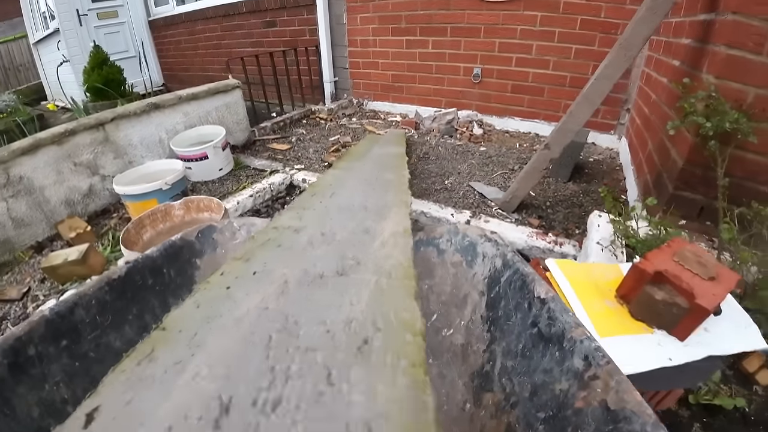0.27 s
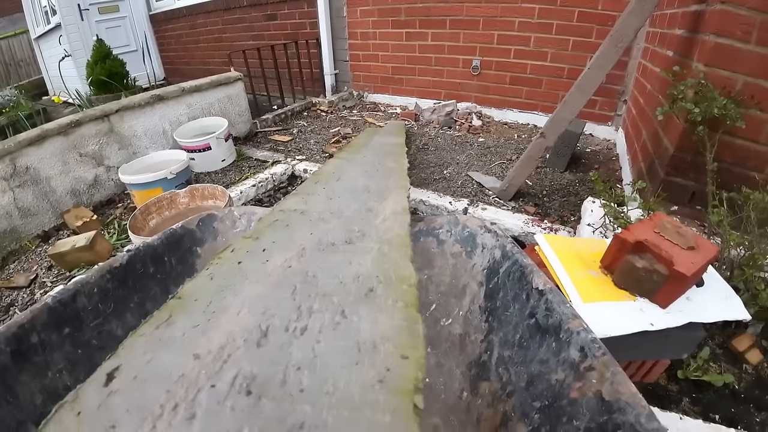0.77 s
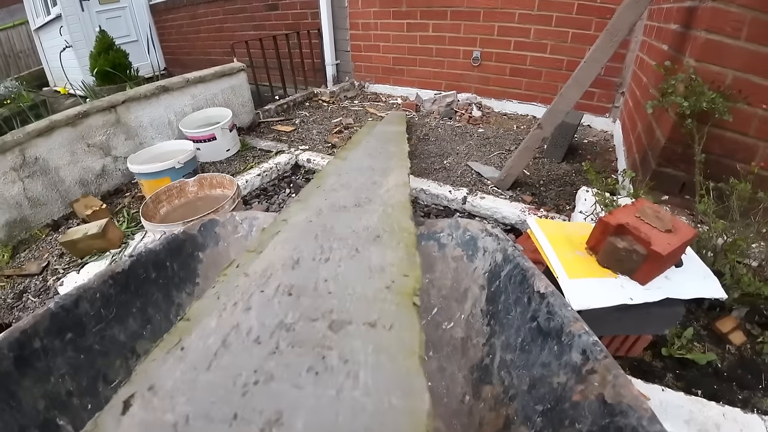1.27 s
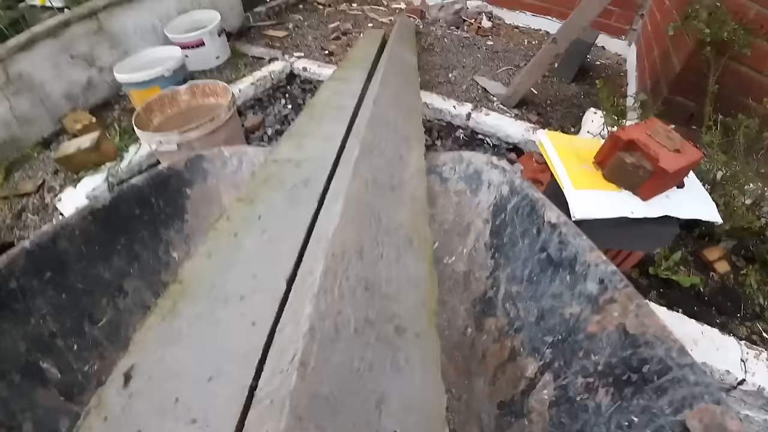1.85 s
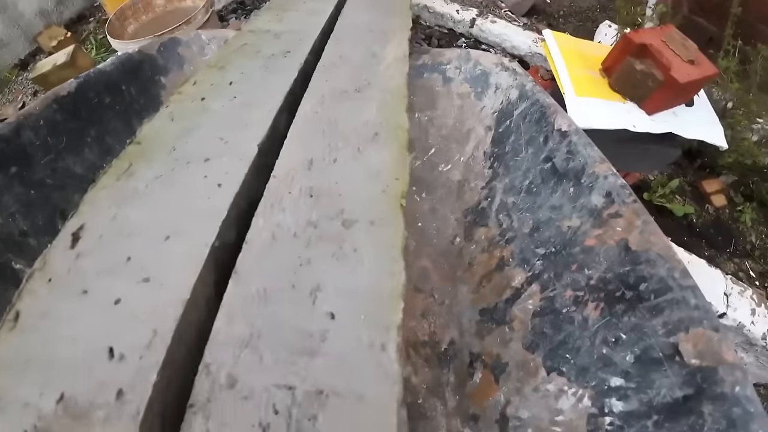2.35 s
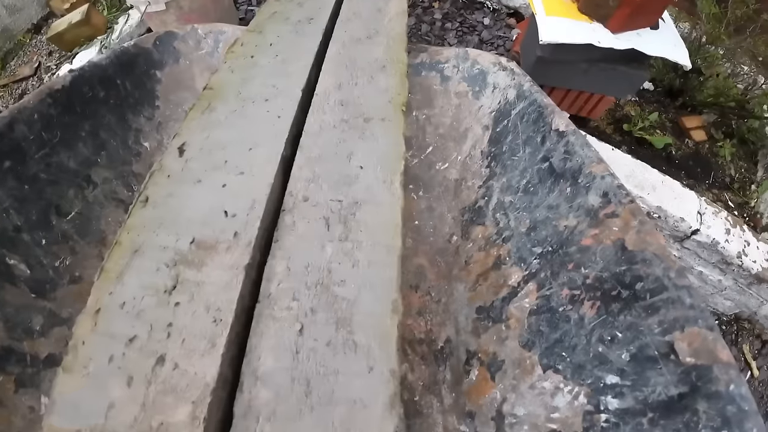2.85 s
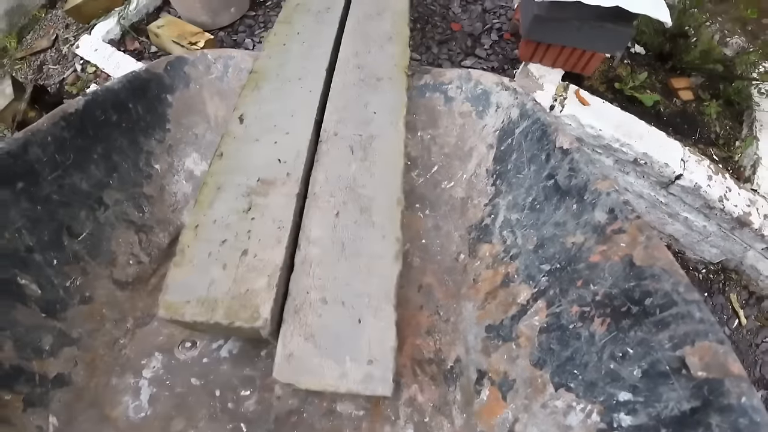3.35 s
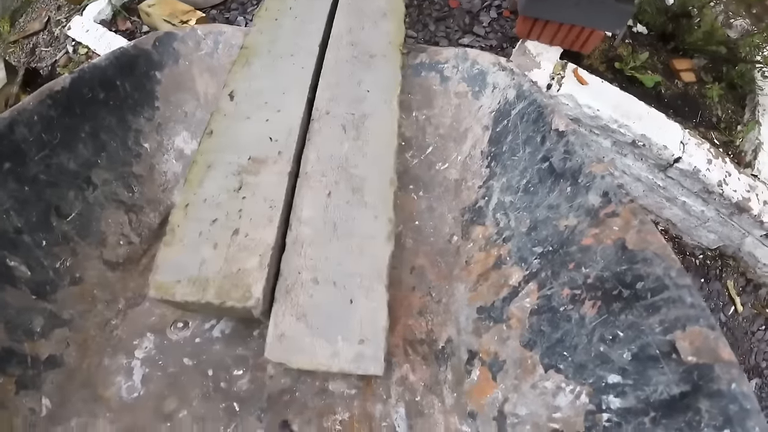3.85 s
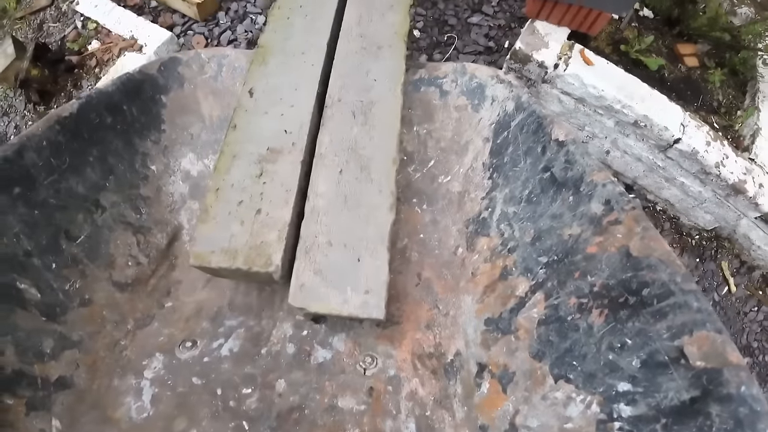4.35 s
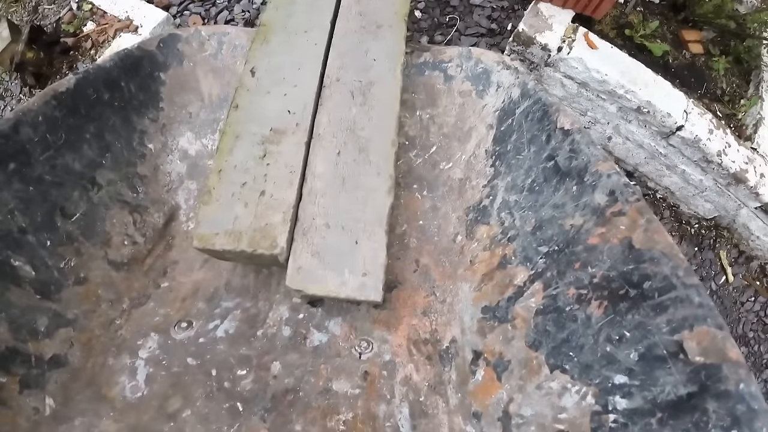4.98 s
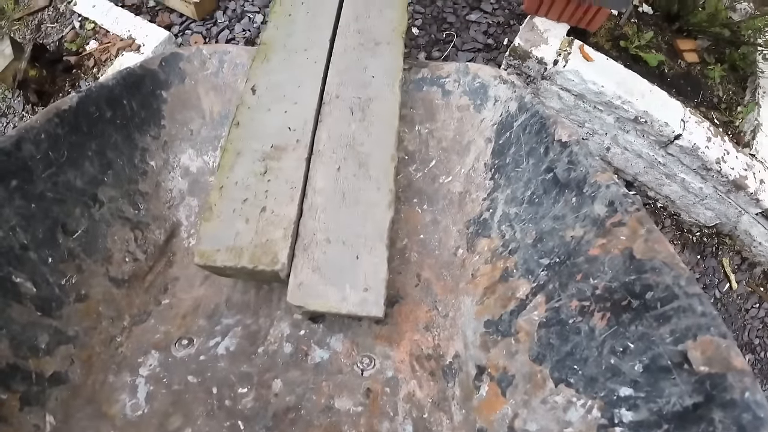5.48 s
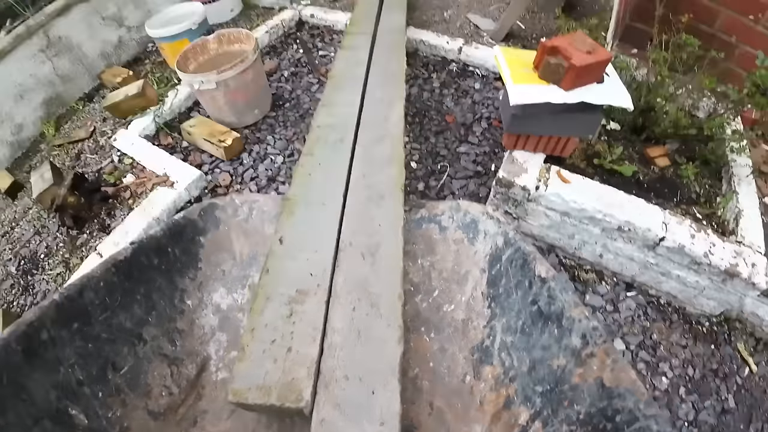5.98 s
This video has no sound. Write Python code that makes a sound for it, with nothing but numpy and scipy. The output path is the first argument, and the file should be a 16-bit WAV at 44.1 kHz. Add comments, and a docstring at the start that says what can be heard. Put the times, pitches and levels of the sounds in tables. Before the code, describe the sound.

Concrete posts are dragged over a steel wheelbarrow's rim in a yard, extremely close, with faint steady air and hiss beneath. From 0.1 to 0.4 s a tight run of booming knocks and stone snaps accompanies short scrapes. After a lull with light taps, a longer growling pull at about 0.95-1.25 s crackles with grit. From 1.6 to 2.2 s rough jerks, hard clanks, low frame lurches and two pitched knocks crowd together. The heaviest grinds hit around 2.45 and 3.1 s, coarse, roaring and overloaded. A faint thin metallic tone sings at 3.3-3.5 s, then a tiny high squeak at 3.6. Another strong gritty surge comes at 3.9-4.15 s, with a fainter ring at 4.2-4.35. Weaker slips, small snaps and soft scrapes dwindle from 4.4 s; taps tick near 5.0. Knocks at 5.65 and 6.0-6.1 s end it.

```python
"""Concrete posts are dragged in jerks over the rim of a steel wheelbarrow in a yard, right under the microphone.
At first filtered random impacts growl, stones snap as short noise bursts, and knocks boom and clank in resonances.
From about 2.5 s come the heaviest grinds; then a thin sine sings twice, around a brief squeak of filtered noise.
Weaker pulls follow, with small pitched taps, and a few knocks end it. Slips are puffs of the same grit noise.
Steady filtered noise is the yard air and microphone hiss; the loud moments overload the input."""
import sys
import numpy as np
from scipy import signal
from scipy.fft import rfft, irfft, next_fast_len
from scipy.io import wavfile
from scipy.ndimage import uniform_filter1d, map_coordinates

SR = 44100
rng = np.random.default_rng(int(sys.argv[2]) if len(sys.argv) > 2 else 0)


def digitize_waveform(pressure):
    """Quantize a signal to 16-bit integers and store it at the path in sys.argv[1].

    Rows of a 2-D input are taken as channels; values are limited to [-1, 1].
    """
    field = np.atleast_2d(pressure).T
    bounded = np.clip(field, -1, 1)
    quanta = np.round(bounded * 32767).astype(np.int16)
    wavfile.write(sys.argv[1], SR, quanta)


N = 273861  # length [samples]

# Each pull on the posts: (full contact [s], rise [s], hold [s], sag while sliding, before its share [dB/s],
# head start of the weight, before its share [s], relative grit [dB], relative scrape [dB],
# fine over coarse grit [dB], relative boom [dB], relative frame shudder [dB])
PULLS = [(0.043, 0.12, 0.11, 28, 0.049, -37, -35.5, 7, -30, -40),
         (0.212, .09, 0.063, 20, 0.022, -24.5, -16.5, -4, -14, -19),
         (0.332, 0.073, 0.13, 63, -0.01, -30, -21, -5.5, -12.5, -28),
         (0.567, 0.029, 0.066, 69, 0.027, -41, -30, -5, -18.5, -29),
         (0.952, 0.12, 0.29, 26, 0.038, -28, -17, -6, -8, -28),
         (1.342, 0.022, 0.018, 60, -0.007, -41.5, -38, -2, -44, -30),
         (1.609, 0.11, .01, 3, 0.0042, -26.5, -20, -5, -12, -18),
         (1.652, .03, 0.042, 5, 0.011, -19.5, -13.5, -5.5, -10.5, -23),
         (1.78, .04, .2, 23, -0.027, -38.5, -25, -4, -16, -28),
         (2.024, 0.073, 0.02, 60, -0.022, -29, -17.5, -4.5, -16.5, -19),
         (2.113, 0.04, 0.1, 72, -0.048, -29, -19.5, -3, -10, -22),
         (2.451, 0.16, .14, 45, 0.0087, -10, -8.5, -5, -13.5, -19.5),
         (2.673, 0.09, 0.024, 50, 0.024, -29.5, -26.5, -8, -18.5, -30),
         (2.792, 0.078, 0.024, 59, 0.011, -29.5, -31, -6, -26, -28),
         (3.087, .06, 0.17, 49, -0.00061, -8.5, -10, -5, -10, -19.5),
         (3.393, .05, .04, 50, 0.025, -52, -33, 0, -17.5, -30),
         (3.529, 0.032, 0.13, 43, -0.016, -36, -42, 8.5, -30, -42),
         (3.859, 0.12, .04, 30, 0.0066, -48, -29.5, -8, -28, -29),
         (3.963, 0.068, 0.2, 72, -.01, -16, -13, -7, -11.5, -20.5),
         (4.224, 0.06, 0.03, 50, -0.0093, -63, -34.5, -2, -20.5, -31),
         (4.392, .02, 0.083, 60, -0.031, -41.5, -44, -5, -33, -36),
         (4.587, 0.16, 0.088, 30, 0.047, -33, -36, -4, -33, -34),
         (4.745, 0.16, 0.073, 28, -0.011, -27.5, -30.5, 4, -28.5, -30),
         (4.909, 0.033, 0.015, 50, .0, -37.5, -44, -8, -38, -43),
         (5.076, .06, 0.04, 30, 0.015, -61, -46, 0, -32.5, -40),
         (5.18, 0.072, 0.033, 50, 0.038, -44, -41.5, -8, -42, -47),
         (5.365, 0.18, 0.06, 40, 0.054, -48, -42, -4, -52, -46),
         (5.621, 0.091, 0.026, 50, -0.008, -47.5, -37, -2, -29.5, -34.5),
         (5.849, 0.069, 0.089, 5, 0.056, -41, -31.5, -6, -35, -44),
         (6.009, .04, 0.091, 30, 0.022, -45.5, -31, -19, -26, -47),
         (6.085, 0.025, .05, 42, 0.0075, -53, -31, -12, -22, -41)]
# The next four lists each hold one value for grit, scrape, boom and shudder, in that order.
# Fall once a pull stops, treble dies first: (fall [dB/s])
FALL_RATES = [317, 119, 83.4, 60]
# Creeping between pulls: (relative level [dB])
CREEP_LEVELS = [-55.5, -55, -53.5, -46]
# Share of the pull's sag: (share [ratio])
SAG_SHARES = [1, 0.69, 0.55, 0.26]
# Share of the weight's head start: (share [ratio])
LEAD_SHARES = [0.067, 0.043, 0.83, 0.61]
# Sound colour of concrete rubbing on steel: (frequency [Hz], relative level per Hz [dB])
RUB_COLOUR = [(210, -35), (350, 4), (537, -2), (645, 0), (714, -4), (1200, -3), (1680, -8), (1820, -11),
              (4000, -27), (5200, -49), (8800, -120)]
# Sound colour of crushed grit: (frequency [Hz], relative level per Hz [dB])
GRIT_COLOUR = [(1290, -24.5), (2200, -4.5), (2350, -8), (2530, -6), (3300, -5), (4600, -7), (5430, -2),
               (6360, -6.5), (7450, -7), (9010, -10.5), (9790, -7), (11300, -9.5), (13200, -38),
               (15100, -24), (16000, -31)]
# Upper modes of tray and posts that colour the scrape: (frequency [Hz], width [Hz], level over the plain rub [dB])
UPPER_MODES = [(767, 16, 5), (979, 13, -1), (1218, 11, -6), (1518, 11, 1.5), (1885, 23, 2),
               (2070, 40, -6.5), (2385, 9.4, 8.5), (2626, 27, 2.5), (3286, 19, -4.5), (3560, 12, 1.5),
               (4270, 12, 3), (4970, 15, 7), (5400, 12, -4), (7500, 70, 0), (10160, 180, -5.5)]
# Low resonances of the loaded tray: (frequency [Hz], width before damping [Hz], relative level [dB])
TRAY_MODES = [(116, 16, -6.5), (137.5, 9.8, -2), (170.6, 34, 0.5), (214.7, 32.6, 0), (264.2, 25, -1.5),
              (306.8, 25.8, -3.5), (375, 63, -11)]
# Where the weight rests on the tray: (time [s], centre of the boom [Hz])
WEIGHT_PATH = [(0, 190), (.2, 129), (.47, 155), (.65, 248), (.88, 130), (1.14, 142), (1.3, 180), (1.6, 120),
               (1.8, 196), (1.95, 198), (2.17, 111), (2.43, 280), (2.6, 215), (2.95, 263), (3.15, 210),
               (3.42, 262), (3.8, 195), (4.04, 267), (4.2, 208), (4.55, 166), (5.3, 190), (5.7, 141),
               (6.21, 187)]
# Resonances of the legs and tyre: (frequency [Hz], width [Hz], relative level [dB])
FRAME_MODES = [(46, 15.5, -5.5), (61, 14.5, -0.5), (83.5, 16.7, -2)]
# The posts bump the tray: (time [s], relative level [dB], clank against the push [dB], centre of the clank [Hz])
KNOCKS = [(0.108, -14.5, -5, 764), (0.177, -11, -11, 1370), (0.188, -7, -20, 900), (0.224, -4.5, -5, 1150),
          (0.257, -5.5, -13, 1300), (0.293, 0.5, -22, 703), (0.329, -10, -10, 1140), (0.36, -22, -25, 904),
          (0.891, -20, -14, 797), (0.933, -10, -32, 807), (0.997, -3.5, -18, 1530), (1.008, -9.5, -3, 1430),
          (1.045, -4.5, -26, 931), (1.216, -17.5, 2, 2300), (1.745, -8.5, 10, 1310), (1.843, -3, -15, 813),
          (1.855, -22, -20, 900), (1.872, -5, -35, 705), (1.956, -7.5, -13, 864), (2.026, -13, -6, 910),
          (2.118, -16, -17, 988), (2.1757, -6, -3, 874), (2.186, -9, -29, 800), (2.192, -8, -29, 1040),
          (2.783, -10.5, -31, 756), (3.951, -6.5, -8, 950), (4.19, -12, -30, 705),
          (5.644, -19.5, -7.5, 703), (5.988, -10.5, -16, 703), (6.001, -8.5, -25, 880),
          (6.086, -13.5, 0.5, 900), (6.101, -10, -28, 1200), (6.122, -15, -20, 1100)]
# Ring of a struck post: (frequency [Hz], relative level [dB], time to fade by 60 dB [s])
POST_MODES = [(673, -1.5, 0.066), (837, 2, 0.052), (1090, -12, 0.26), (1247, 2, 0.098), (1554, -6.5, 0.091),
              (1680, -0.5, 0.1), (1970, -1.5, 0.056), (2330, 9, 0.061), (2870, 7.5, 0.074),
              (3360, 7, 0.038)]
# Sudden slips, a gritty puff each: (time [s], relative level [dB], relative brightness [dB], length [ms])
SLIPS = [(0.1121, -25.5, 7, 23), (0.1755, -19, 2, 18), (0.33, -14, -1, 25), (0.4439, -38, -14, 24),
         (0.571, -24.5, -1, 20), (0.6294, -34, -5, 24), (0.682, -34, 10, 31), (0.913, -19, 8, 19),
         (1.0874, -16, 1, 13), (1.215, -12, -12, 22), (1.7445, -22, -10, 22), (1.3458, -23.5, 0.5, 17),
         (1.4466, -32.5, -16, 14), (1.5685, -19, -0.5, 39), (1.615, -27, -13, 16), (1.6475, -3.5, -18, 7.3),
         (1.8402, -16, -10, 42), (1.937, -11.5, -6, 20), (2.005, -15.5, 3, 12), (2.104, -13.5, 0, 42),
         (2.189, -11, -11, 10), (2.342, -28, 20, 15), (2.376, -18.5, 18.5, 110), (2.55, -8, 11, 15),
         (2.672, -17.5, 4, 18), (2.782, -13.5, 2.5, 11), (3.029, -23.5, 9, 18), (3.528, -26, 20, 10.6),
         (3.5924, -30.5, 18, 35), (3.762, -36.5, 7, 27), (3.815, -26.5, -20, 18), (3.865, -15, -6, 20),
         (3.918, -15, 3, 27), (3.9375, -1, -2.5, 57), (4.091, -8, 5.5, 30), (4.166, -18, 0, 16),
         (4.3897, -22, 2.5, 15), (4.5221, -31, 10, 21), (4.579, -22, 3, 26), (4.6159, -19.5, 4, 20),
         (4.671, -18.5, -7.5, 42), (4.7303, -13, 3, 38), (4.776, -16.5, 6, 24), (4.915, -20, 4.5, 20),
         (5.024, -35, 1, 24), (5.1243, -31, -2, 30), (5.185, -22, 4.5, 16.4), (5.3844, -34, 3, 15),
         (5.6176, -32, -16.5, 19), (5.7494, -39, 3, 24), (5.8336, -35, -15, 18), (6.0127, -30, -8, 24)]
# A brief high squeak of grit: (centre time [s], frequency [Hz], level [dB], length [s])
SQUEAK = (3.593, 11200, -30, .016)
# Single stones snapping: (time [s], relative level [dB], relative dull part [dB])
SNAPS = [(0.2015, -7, -13), (0.225, -6.5, -11), (0.25, -6, -6), (0.2608, -5.5, -2), (0.2737, -7.5, -2),
         (0.2824, -15, -10), (0.2944, -3, 5.5), (0.3064, -17, -15), (0.4065, -17, 3), (0.4634, -27, -3),
         (0.9831, -7, -10), (1.01, -16, -8), (1.0264, -5, -16), (1.044, -8, -10), (1.0884, -9.5, -11),
         (1.0935, -16, -10), (1.0973, -10, -8), (1.1207, -8, -8), (1.14, -15, -8), (1.1432, -14, -8),
         (1.1582, -16, -14), (1.1723, -15, -8), (1.1777, -15, -8), (1.199, -14, -1), (1.2036, -22, -8),
         (1.224, -10, -6), (1.234, -15, -8), (1.6166, -6.5, 0), (1.6477, -7, 0), (1.675, -3, -6),
         (1.7454, -21, 3), (1.778, -18, 1), (1.7933, -23, 7), (1.841, -10.5, 3), (1.8567, -8.5, 7),
         (1.8767, -15.5, 8), (1.8838, -12, -3), (1.9046, -17, 0), (1.9848, -23, -8), (2.0253, -17, -2),
         (2.0877, -19, -8), (2.116, -9, -6), (2.3747, -22, -15), (2.816, -18, -18), (2.8544, -27, -5),
         (4.2063, -39, -3), (4.3217, -36, 7), (4.4283, -28, -15), (4.4882, -34, -12), (4.545, -33, -18),
         (4.58, -26, -16), (4.5916, -12, -16), (4.6165, -16, -25), (4.7152, -16, -20), (4.7312, -8, -22),
         (4.779, -12.5, -20), (4.8798, -25, -18), (4.9162, -13.5, -25), (5.09, -29, 4), (5.1865, -21, -17),
         (5.7332, -32, 13), (6.0135, -12.5, -21), (6.0858, -14.5, 16), (6.101, -33, 21)]
# The frame lurches on its tyre: (time [s], relative level [dB])
JOLTS = [(.21, -14), (.34, -18), (.52, -22), (.94, -21), (1.598, -8.5), (1.858, -1), (1.94, -8), (2.17, -5),
         (2.36, -10), (2.48, -8.5), (2.811, -15), (3.14, -15), (3.28, -9), (3.899, -19), (4.021, -7),
         (5.94, -24), (6.15, -32)]
# Small pitched taps, perhaps loose pebbles: (time [s], level [dB], starting pitch [Hz], time to fade by 60 dB [s])
TAPS = [(.633, -32, 2050, .03), (.746, -27, 2030, 0.019), (.855, -31, 2070, 0.024),
        (2.117, -12.5, 1010, .06), (2.176, -7, 913, 0.069), (4.915, -41, 2080, 0.037),
        (5.033, -26.5, 754, 0.054), (5.049, -29, 780, 0.055), (5.645, -16, 656, 0.023),
        (6.086, -17, 940, 0.037)]
# When the thin rim mode sings: (start [s], damped by [s], level before it wavers [dB])
RIM_SINGS = [(3.3, 3.52, -54), (4.2, 4.36, -64)]
# Sound colour of yard and microphone hiss: (frequency [Hz], relative level per Hz [dB])
AIR_COLOUR = [(18, -27), (30, 12), (64, -2.5), (118, 0), (215, 4), (354, -11), (889, -4.5), (2820, -25.5),
              (10200, -30.5), (16000, -76)]
# Level balance of the two channels: (frequency [Hz], left minus right [dB])
BALANCE = [(30, 1.1), (70, .9), (130, .6), (260, .25), (500, .05), (2000, 0), (5000, -.2), (8000, 0)]
# The channels differ a little in phase: (frequency [Hz], size of the quarter-turn part [dB])
PHASE_SKEW = [(40, -29), (120, -30.5), (300, -34.5), (700, -69.5), (1500, -82), (3000, -80), (5500, -33),
              (9000, -28), (13000, -70)]

RISE_DB = 30  # climbed during a pull's rise
CATCH_DB, CATCH_S = 2, 0.011  # the post sticks for a moment before each slip
SLIP_RISE_MS = 2
FOCUS_DB = 10  # fall of the clank away from its centre, per squared octave
RATTLE_DB, RATTLE_T60_S = -6.5, 0.11  # loose grit jumps after a clank
RIM_HZ = 4915
AIR_DB = -41
TOP_HZ = 16100  # band limit of the input


def drag(grit_db, scrape_db, fine_db):
    """The rough underside of the posts grinds over the rim, sticking and slipping."""
    judder = amp(0.64 * wobble(27.71) + 1.27 * wobble(70))  # stick-slip
    dull, coarse, fine = rough(900, 1.0)
    grains = patchy(coarse, depth_db=2.0) * amp(-fine_db / 2) + fine * amp(fine_db / 2)
    grit = judder * amp(grit_db - 6.0 + 2.3 * wobble(40)) * grains
    scrape = judder * amp(scrape_db - 3.0) * patchy(dull, depth_db=2.5)
    return catches() * (scrape + grit)


def contact():
    """Level of grit, scrape, boom and shudder (dB) and fineness of the grit: each pull rises, sags and lets go."""
    t = np.arange(0, N / SR + .002, .001)
    columns = np.transpose(PULLS)[:, :, None]
    s, rise, hold, sag, lead, grit_db, scrape_db, fine_db, boom_db, shudder_db = columns
    powers = []
    peaks = (grit_db, scrape_db, boom_db, shudder_db)
    for peak_db, sag_share, fall, lead_share in zip(peaks, SAG_SHARES, FALL_RATES, LEAD_SHARES):
        since = t - s + lead_share * lead  # seconds since full contact
        db = peak_db - RISE_DB * np.maximum(-since, 0) / rise
        db = db - sag_share * sag * np.clip(since, 0, hold)
        db = db - fall * np.maximum(since - hold, 0)
        powers.append(amp(db) ** 2)
    # the pull that gives most grit decides how fine it is
    fine = np.sum(powers[0] * fine_db, 0) / (np.sum(powers[0], 0) + amp(CREEP_LEVELS[0]) ** 2)
    levels = [10 * np.log10(np.sum(power, 0) + amp(creep_db) ** 2)
              for power, creep_db in zip(powers, CREEP_LEVELS)]
    return track(np.transpose([t, *levels, fine]))


def catches():
    """Gain of the sliding sound: it sinks towards each slip and returns as the post breaks free."""
    dip, t = np.zeros(N), np.arange(SR // 20) / SR
    for s, *_ in SLIPS:
        add(dip, s - t[-1], np.exp((t - t[-1]) / CATCH_S))
    return amp(-CATCH_DB * dip)


def rough(per_s, smooth):
    """Dull rub, coarse grit and fine grit, each of rms 1, from one stream of impacts."""
    def shades(hz):
        modes = 1 + sum(amp(db) * w * w / (w * w + 4 * (hz - c) ** 2) for c, w, db in UPPER_MODES)
        fine = 1 / (1 + (6800 / (hz + 1)) ** 8)  # share of the grit above 6800 Hz
        grit = amp(along(GRIT_COLOUR, hz))
        return modes * np.array([amp(along(RUB_COLOUR, hz)), grit * (1 - fine), grit * fine])

    return [unit(x) for x in filtered(asperities(per_s, 1.87, smooth), shades)]


def asperities(per_s, spread_db, smooth):
    """Tiny random impacts of long-tailed size over a share of smooth rubbing."""
    hit = rng.random(N) < per_s / SR
    rank = np.minimum(rng.exponential(size=N), 4)  # no stone is larger than the gap
    impacts = unit(hit * amp(spread_db * rank) * rng.choice([-1, 1], N))
    return unit(impacts + smooth * rng.standard_normal(N))


def patchy(x, depth_db):
    """The spot of contact wanders, so narrow bands swell and fade by turns."""
    bands = signal.stft(x, nperseg=1024)[2]
    field = uniform_filter1d(rng.standard_normal(bands.shape), size=3, axis=0)
    field = uniform_filter1d(field, size=3, axis=1)
    return unit(signal.istft(bands * amp(depth_db * unit(field)), nperseg=1024)[1][:N])


def rumble(boom_db, shudder_db):
    """Bumps under the posts drive tray and frame; where the weight rests decides which tray modes answer most."""
    centre_hz, = track(WEIGHT_PATH)
    shares = np.array([amp(db) * near(hz, centre_hz, 11) for hz, _, db in TRAY_MODES])
    shares /= np.sqrt(np.sum(shares ** 2, 0))
    shares *= amp(boom_db + 2.5 + 0.93 * wobble(12)) * catches() ** 0.74
    bumps = asperities(260, 1.56, 1.15)
    boom = np.zeros(N)
    for share, (hz, width, _) in zip(shares, TRAY_MODES):
        mode = resonant([(hz, 1.5 * width, 0)])
        boom += share * unit(filtered(bumps, lambda f: mode(f) ** 2))
    shakes = asperities(89, 1.0, 1.6)
    shudder = unit(filtered(shakes, lambda f: resonant(FRAME_MODES)(f) * soft(f, 126)))
    return boom + shudder * amp(shudder_db + 0.4 + 2.4 * wobble(14))


def knocks():
    """A soft push booms the tray; a hard contact also rings the post around the pitch that the spot favours."""
    push, clank, jump = np.zeros((3, N))
    t = np.arange(SR // 4) / SR
    blow = signal.windows.hann(round(0.0025 * SR))
    for s, db, clank_db, centre_hz in KNOCKS:
        add(push, s, amp(db + 16) * blow * rng.choice([-1, 1]))
        ring = np.zeros(len(t))
        for hz, level, t60 in POST_MODES:
            fade = amp(level + rng.normal(0, 2.7) - 60 * t / t60)
            # the grit between post and steel roughens every mode
            phase = rng.normal(0, 1.0) + np.cumsum(rng.normal(0, 0.028, len(t)))
            ring += near(hz, centre_hz, FOCUS_DB) * fade * np.sin(2 * np.pi * hz * t + phase)
        add(clank, s, amp(db + clank_db - 7.5) * ring * (1 - np.exp(-t / 0.0019)))
        rattle_db = db + clank_db + RATTLE_DB - 60 * t / RATTLE_T60_S
        add(jump, s, amp(rattle_db) * (1 - np.exp(-t / 0.0063)))
    clank += jump * unit(coloured(asperities(900, 5.5, 0.38), RUB_COLOUR))
    damped = [(hz, 3.43 * width, db) for hz, width, db in TRAY_MODES]  # the post's weight damps the sheet
    return filtered(push, lambda f: resonant(damped)(f) * (1 - soft(f, 270))) + clank


def slips():
    """A slip starts fast, runs briefly and stops as the post catches again."""
    shapes, ms = np.zeros((3, N)), 1000 * np.arange(SR // 4) / SR
    for s, db, bright_db, length_ms in SLIPS:
        shape = amp(db - 14.5) * np.exp(-(ms / length_ms) ** 2) * (1 - np.exp(-ms / SLIP_RISE_MS))
        part_levels = (-1.1 * bright_db - 8, 0, 0.76 * bright_db - 1.5)  # dull, coarse, fine
        for layer, part_db in zip(shapes, part_levels):
            add(layer, s, shape * amp(part_db))
    return np.sum(shapes * rough(3000, 1.4), 0)


def squeak():
    """Grit squeaks briefly: noise through a narrow resonance, swelling and fading."""
    s, hz, db, length_s = SQUEAK
    tone = unit(filtered(rng.standard_normal(N), lambda f: resonant([(hz, 600, 0)])(f) ** 2))
    return amp(db) * tone * np.exp(-((np.arange(N) / SR - s) / length_s) ** 2)


def snaps():
    """A stone cracks in about a millisecond: a noise burst with a gritty and a dull part."""
    gritty, dull = np.zeros((2, N))
    t = np.arange(SR // 50) / SR
    for s, db, dull_db in SNAPS:
        crack = rng.standard_normal(len(t)) * amp(-60 * t / .003)
        crack /= np.max(np.abs(crack))
        add(gritty, s, amp(db + 12.0) * crack)
        add(dull, s, amp(db + dull_db + 16.0) * crack)
    return coloured(gritty, GRIT_COLOUR) + coloured(dull, RUB_COLOUR)


def jolts():
    """Each lurch is one push into the legs and tyre."""
    push = np.zeros(N)
    for s, db in JOLTS:
        add(push, s, amp(db + 13) * signal.windows.hann(round(0.0045 * SR)) * rng.choice([-1, 1]))
    return filtered(push, resonant(FRAME_MODES))


def taps():
    """Each tap is one short, slightly falling note."""
    out, t = np.zeros(N), np.arange(SR // 8) / SR
    for s, db, hz, t60 in TAPS:
        note = np.sin(2 * np.pi * hz * t * (1 - 2 * t))
        add(out, s, amp(db - 60 * t / t60) * (1 - np.exp(-t / 0.00028)) * note)
    return out


def rim():
    """A thin rim mode sings on after a hard scrape: it swells in, wavers a little and is quickly damped."""
    t, level = np.arange(N) / SR, np.zeros(N)
    for start, end, db in RIM_SINGS:
        level += amp(db) * np.clip((t - start) / .04, 0, 1) * np.clip((end - t) / .008, 0, 1)
    return level * amp(1.8 * wobble(14)) * np.sin(2 * np.pi * RIM_HZ * t + 0.53 * wobble(30))


def air():
    """Yard air and microphone hiss are steady coloured noise."""
    return amp(AIR_DB) * unit(coloured(rng.standard_normal(N), AIR_COLOUR))


def amp(db):
    """Decibels to a plain factor."""
    return 10 ** (np.asarray(db) / 20)


def unit(x):
    """Scale to an rms of 1."""
    return x / np.sqrt(np.mean(x ** 2) + 1e-20)


def along(points, hz):
    """Read a curve of (frequency [Hz], value) points on a log frequency axis."""
    f, value = np.transpose(points)
    return np.interp(np.log(hz + 1), np.log(f + 1), value)


def track(rows):
    """One value per sample for each column after the time."""
    s, *columns = np.transpose(rows)
    return [np.interp(np.arange(N) / SR, s, column) for column in columns]


def wobble(rate):
    """A smooth random curve with rate knots a second."""
    knots = rng.standard_normal(int(N * rate / SR) + 4)
    return map_coordinates(knots, [np.arange(N) * rate / SR])


def filtered(x, response):
    """Pass x through a complex response of frequency."""
    m = next_fast_len(N + SR // 2)  # spare room for the ring to die away
    return irfft(rfft(x, m) * response(np.fft.rfftfreq(m, 1 / SR)), m)[..., :N]


def coloured(x, spectrum):
    """Shape x by a curve of (frequency [Hz], level [dB]) points."""
    return filtered(x, lambda hz: amp(along(spectrum, hz)))


def resonant(modes):
    """Response of (frequency [Hz], width [Hz], level [dB]) modes that ring after a push, with alternating signs."""
    def response(f):
        return sum((-1) ** k * amp(db) * 1j * f * w / (c * c - f * f + 1j * f * w)
                   for k, (c, w, db) in enumerate(modes))

    return response


def near(hz, centre_hz, fall_db):
    """Gain that falls with the squared distance in octaves."""
    return amp(-fall_db * np.log2(hz / centre_hz) ** 2)


def soft(hz, edge_hz):
    """A broad, soft contact passes little treble."""
    return 1 / (1 + 1j * hz / edge_hz) ** 2


def add(layer, s, sound):
    """Mix a sound into a layer at s seconds, cut at the end."""
    part = layer[round(s * SR):][:len(sound)]
    part += sound[:len(part)]


def scene():
    """Sum all sources and give the two channels slightly different levels and phases."""
    grit_db, scrape_db, boom_db, shudder_db, fine_db = contact()
    barrow = drag(grit_db, scrape_db, fine_db) + rumble(boom_db, shudder_db)
    barrow += knocks() + slips() + squeak() + snaps() + jolts() + taps() + rim()
    mono = barrow + air()
    sides = np.array([[1], [-1]])  # left, right

    def stereo(hz):
        return amp(along(BALANCE, hz) * sides / 2) + 1j * sides * amp(along(PHASE_SKEW, hz))

    return filtered(mono, stereo)


def record(dry):
    """The input overloads near full scale and keeps nothing above its band limit."""
    clipped = dry / (1 + np.abs(dry / .97) ** 6) ** (1 / 6)
    return filtered(clipped, lambda hz: hz < TOP_HZ)


dry = scene()
out = record(dry)
digitize_waveform(out)
```